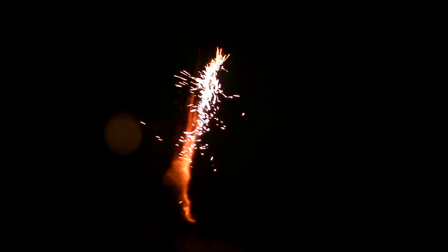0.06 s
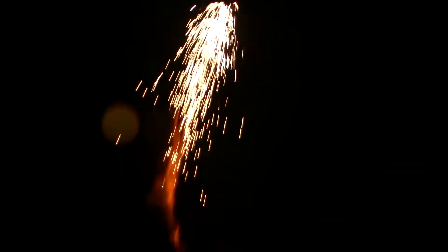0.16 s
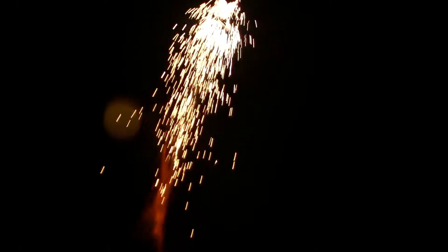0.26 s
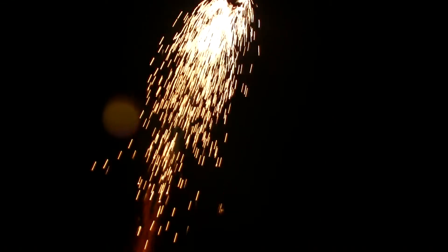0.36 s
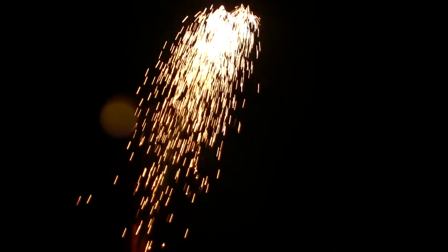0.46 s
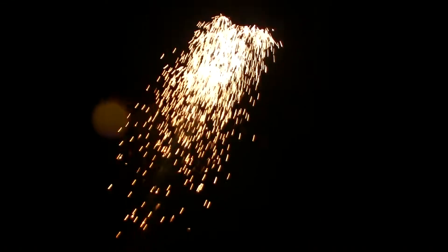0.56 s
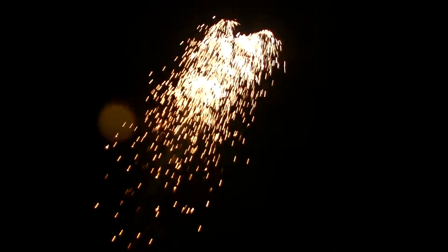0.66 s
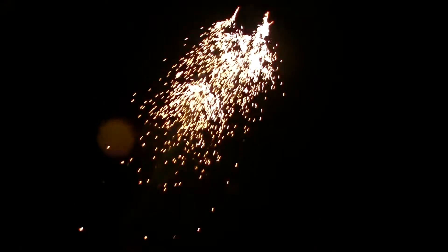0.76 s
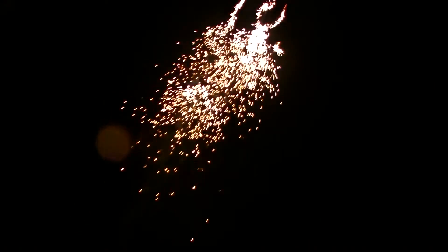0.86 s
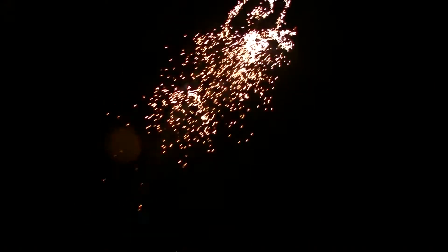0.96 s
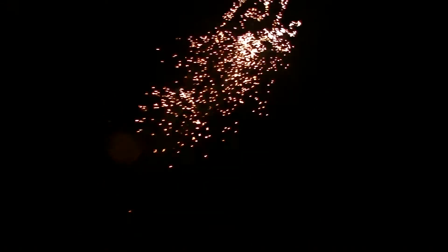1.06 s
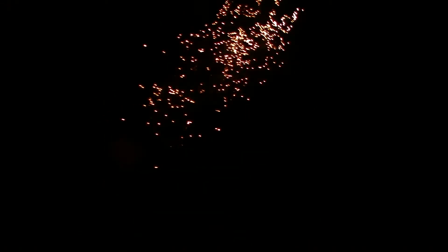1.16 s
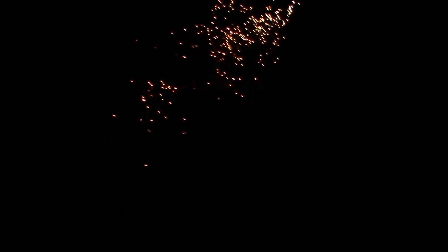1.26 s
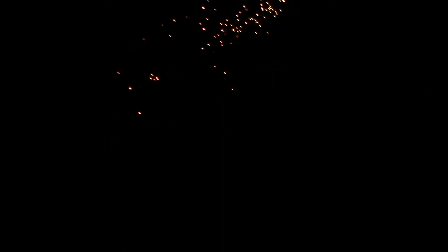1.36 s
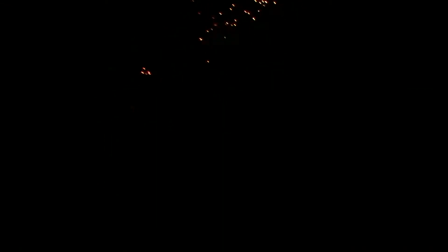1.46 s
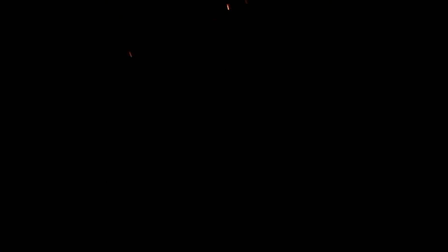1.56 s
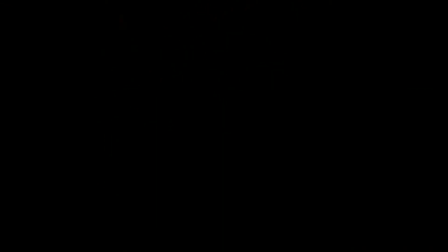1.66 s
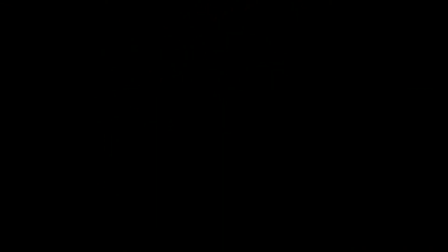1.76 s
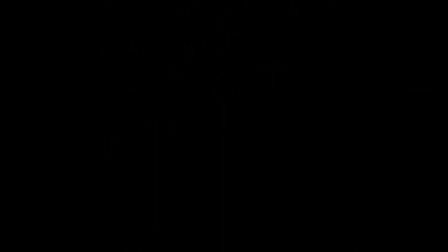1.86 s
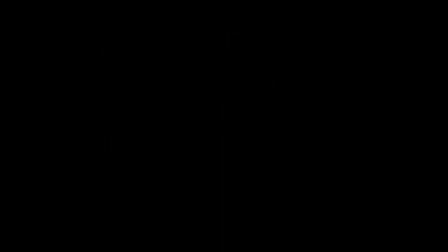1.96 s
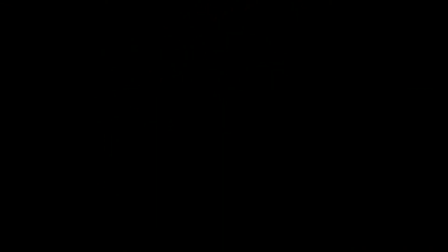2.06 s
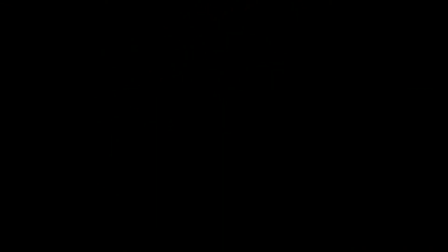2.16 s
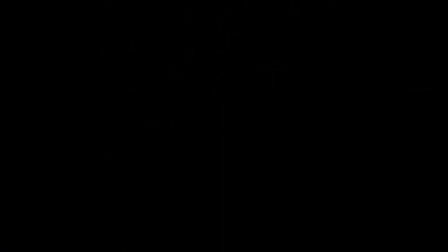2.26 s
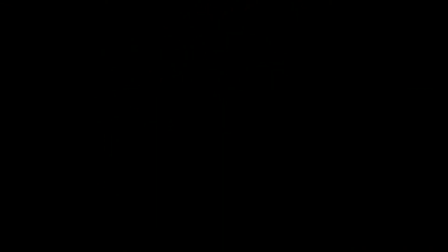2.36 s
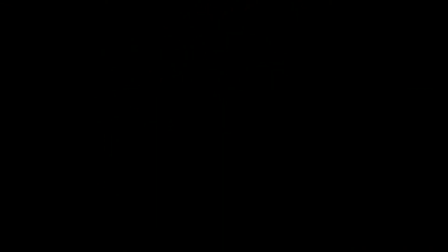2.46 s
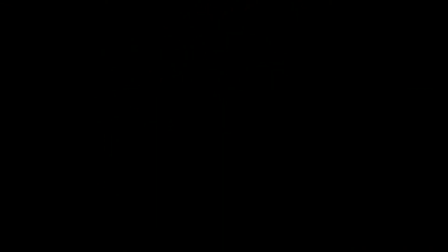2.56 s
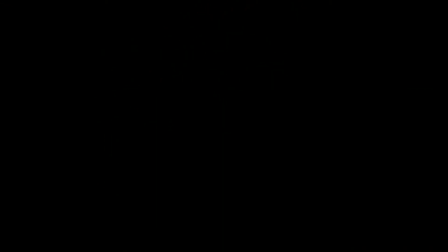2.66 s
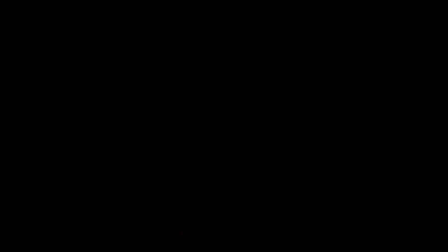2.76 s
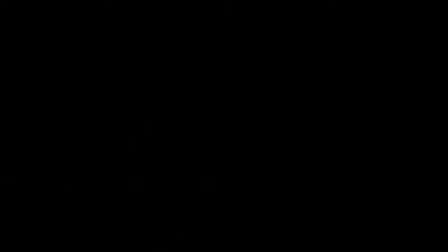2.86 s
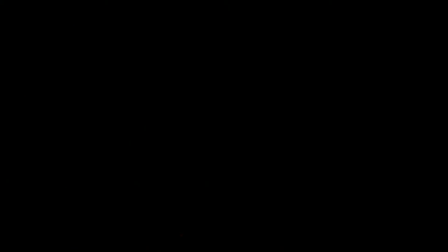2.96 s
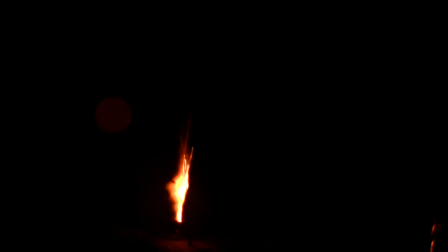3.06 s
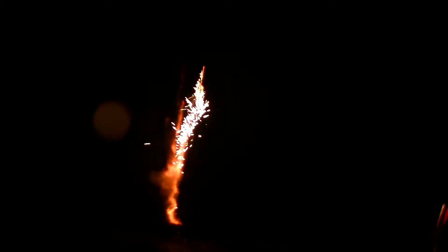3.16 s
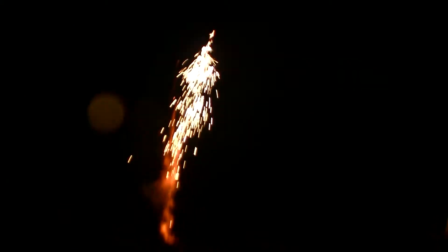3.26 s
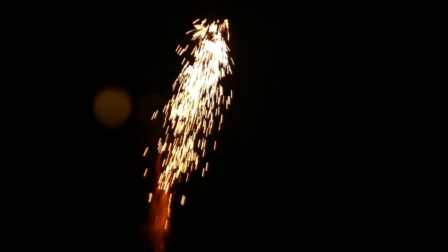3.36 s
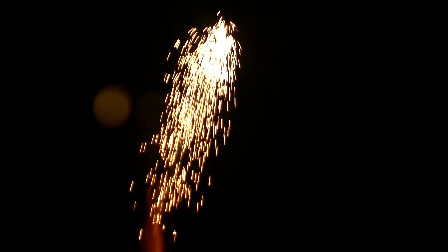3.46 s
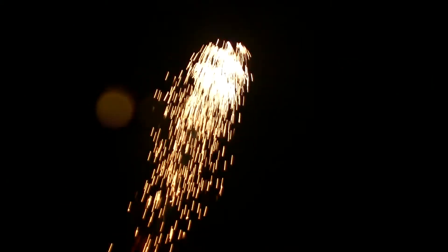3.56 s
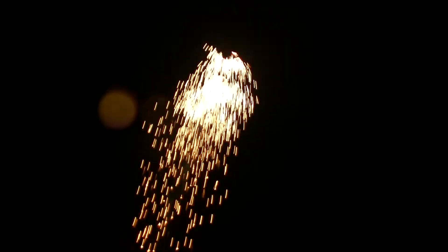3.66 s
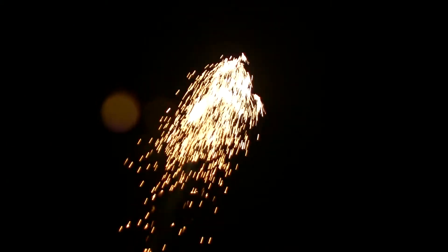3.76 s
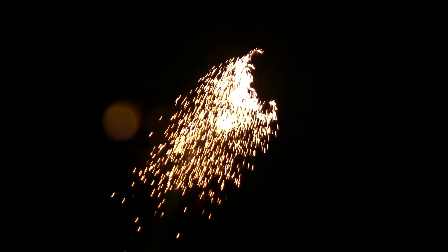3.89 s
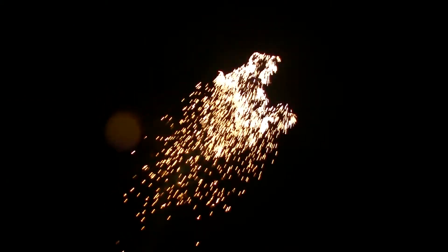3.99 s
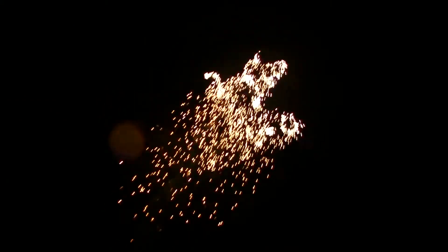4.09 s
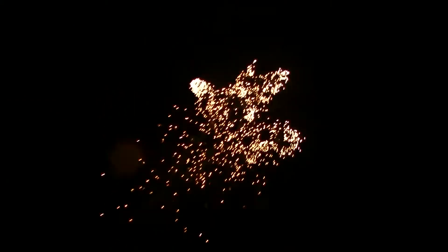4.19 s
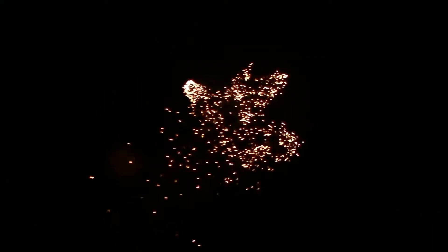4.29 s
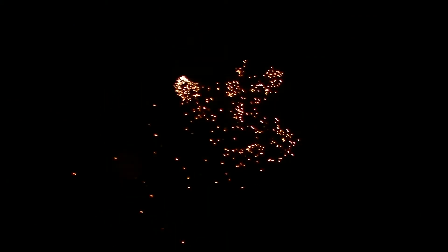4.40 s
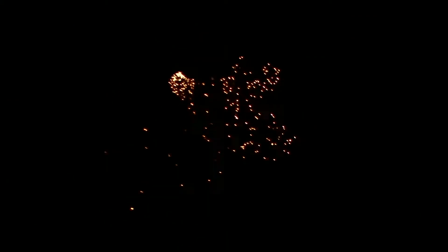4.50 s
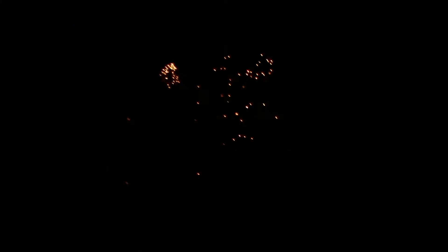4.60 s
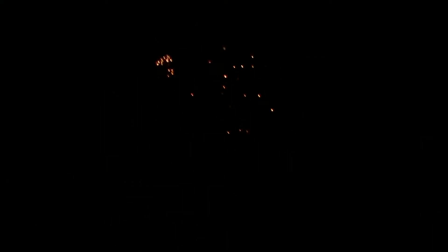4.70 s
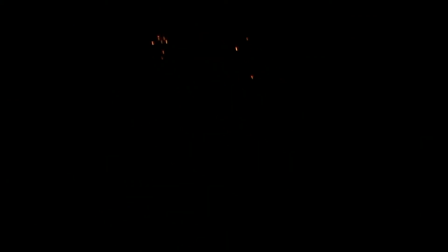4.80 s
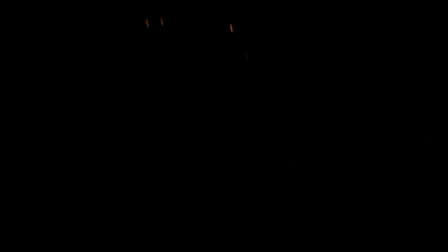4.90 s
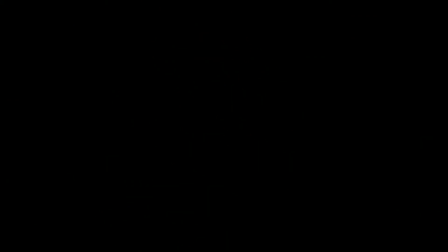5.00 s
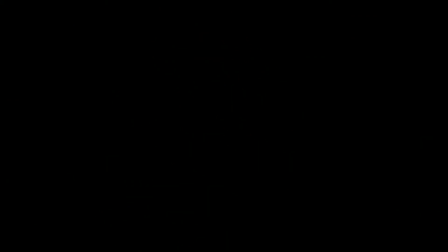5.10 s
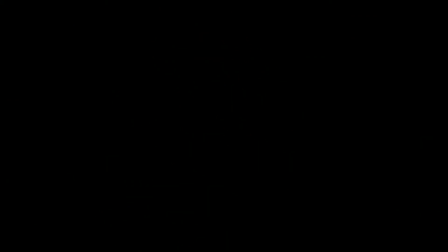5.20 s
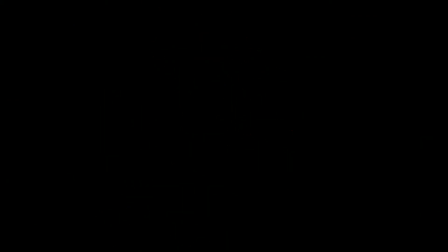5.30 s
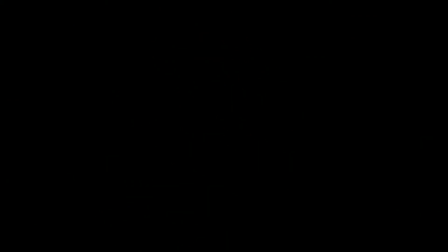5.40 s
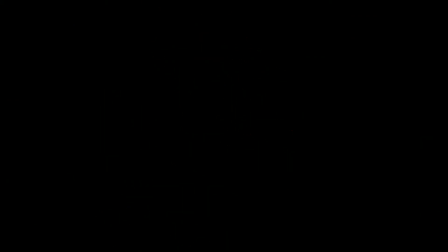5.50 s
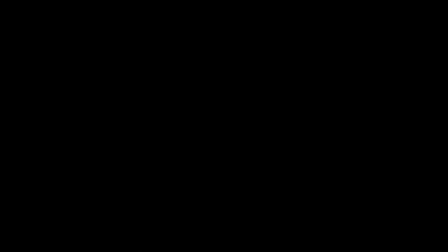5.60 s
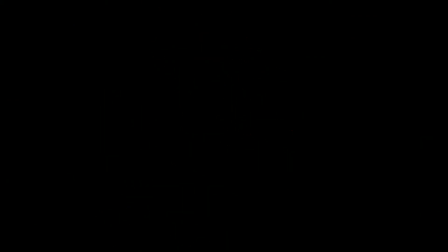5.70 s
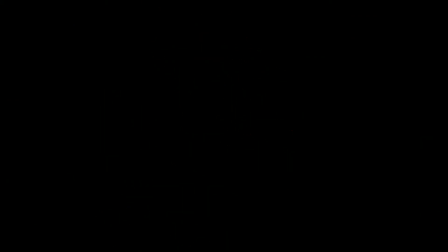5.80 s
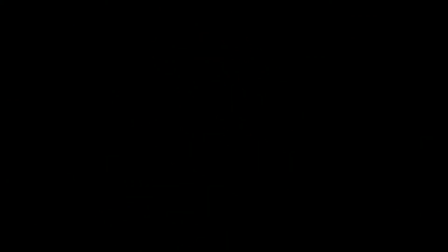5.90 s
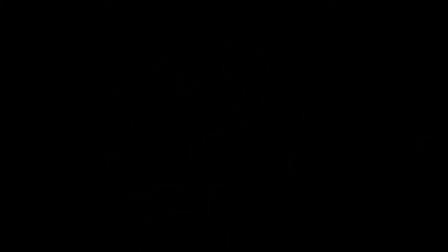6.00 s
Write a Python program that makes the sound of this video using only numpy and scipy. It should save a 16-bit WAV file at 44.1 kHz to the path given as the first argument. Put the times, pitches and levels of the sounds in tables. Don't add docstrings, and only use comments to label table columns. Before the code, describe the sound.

The sound opens mid-launch with a loud, gritty roar of burning gas and bright, crackling fizz, close to a small camera microphone in an open night yard. A rough whistle rides in it, starting high and shrill and sliding down over the first second, flaring and fluttering as the pellets spin. Around 0.8 to 1.2 s the roar thins into a few clearer singing tones that sink, then bend upward and vanish. A soft echo lingers; from 1.4 to 2.9 s tiny embers snap while low wind buffets, faint hum and hiss slowly return. At 3.1 s a brief gas leak and a hard, sharp pop fire the second load. Its screech bursts out, falls again, roughens and weakens after 4 s, with buzzing, wavering tones rising away by 4.6 s. Echo decays, a few faint snaps tick until 5.1 s, then hiss and light wind remain to about 6 s.

```python
import sys
import numpy as np
from scipy import signal
from scipy.fft import rfft, irfft, next_fast_len
from scipy.io import wavfile

SR = 44100
rng = np.random.default_rng(int(sys.argv[2]) if len(sys.argv) > 2 else 0)


def generate_wav(sig):
    pcm = np.round(np.clip(np.atleast_2d(sig).T, -1, 1) * 32767).astype(np.int16)
    wavfile.write(sys.argv[1], SR, pcm)


def nominal_scale(level):
    x = np.asarray(level, float) / 20
    return 10 ** x


N = 266540
T = np.arange(N) / SR
LAUNCH_S = (-.03, 3.11)

# frequency in Hz, level in dB.
ROAR = [(40, -52), (120, -30), (220, -13), (660, -8), (2000, -7), (3500, -3), (5000, -7), (7000, -20),
        (15000, -50), (20000, -120)]
# frequency in Hz, level in dB.
FIZZ = [(300, -90), (1500, -30), (3500, -4), (6000, -3), (9000, -13), (12000, -21), (15500, -32),
        (20000, -120)]


def unit(x):
    return x / np.sqrt(np.mean(x ** 2) + 1e-20)


def curves(rows, t=T):
    s, *cols = np.transpose(rows)
    return [np.interp(t, s, c) for c in cols]


def gate(start, end, fade, t=T):
    return np.clip(np.minimum(t - start, end - t) / fade + 1, 0, 1)


def during(start, end):
    return slice(max(round(start * SR) - 900, 0), round(end * SR) + 900)


def since_launch():
    return T - np.where(T < LAUNCH_S[1], *LAUNCH_S)


def wobble(rate):
    knots = np.sqrt(3 / 2) * rng.standard_normal(N // 128)
    return np.interp(T * rate, np.arange(len(knots)), knots)


def low(x, hz):
    return signal.sosfilt(signal.butter(2, hz, fs=SR, output="sos"), x)


def colour(x, points):
    m = next_fast_len(N + 8192)
    f, db = np.transpose(points)
    bins_hz = np.fft.rfftfreq(m, 1 / SR)
    gain = nominal_scale(np.interp(np.log(bins_hz + 1), np.log(f), db))
    return unit(irfft(rfft(x, m) * gain, m)[:N])


def noise(points):
    return colour(rng.standard_normal(N), points)


def shocks(rate, spread_db, smooth):
    when, size, plain = rng.random(N), rng.standard_normal(N), rng.standard_normal(N)
    sizes = nominal_scale(spread_db * np.clip(size, -3, 2.2))
    jumps = (when < rate / SR) * sizes * np.sign(plain)
    return unit(jumps) + smooth * plain[::-1]


def resonate(x, hz, width_hz):
    turn = np.exp(2j * np.pi * np.cumsum(hz) / SR)
    hold = np.exp(-np.pi * width_hz / SR)
    ringing = signal.lfilter([1], [1, -hold], x / turn)
    return unit((ringing * turn).imag)


def spin(flares, length):
    beam = np.zeros(N)
    for s, db in flares:
        span = during(s, s + .15)
        u = np.clip((T[span] - s + .006) / (.25 * length), 0, 60)
        beam[span] += nominal_scale(db) * u * np.exp(1 - u)
    return beam


def night():
    # time in seconds, level in dB.
    gusts = [(1.22, -75), (1.274, -60), (1.676, -52), (1.762, -34), (1.936, -35), (2.08, -47), (2.1, -44),
             (2.186, -36), (2.306, -45), (2.5, -37), (2.722, -40), (2.812, -29), (2.95, -43), (3.08, -41),
             (4.6, -69), (5.634, -42), (5.654, -48), (6.04, -42)]
    # frequency in Hz, level in dB.
    buffet = [(20, -24), (40, -5), (100, 0), (200, -3), (400, -16), (900, -40), (3000, -120)]
    # frequency in Hz, level in dB.
    far_hum = [(30, -30), (150, -8), (400, 0), (900, -4), (1800, -8), (4000, -24), (6000, -45),
               (12000, -120)]
    # frequency in Hz, level in dB.
    far_walls = [(200, -50), (700, -26), (1150, -9), (1550, -13), (1950, -8), (2350, 0), (2850, -11),
                 (4000, -22), (6000, -45), (12000, -120)]
    # frequency in Hz, level in dB.
    mic_hiss = [(1500, -30), (3500, -3), (5000, 0), (10000, -4), (14800, -11), (16000, -16)]
    # frequency in Hz, level in dB.
    afterglow = [(300, -24), (600, -6), (1500, -5), (3000, 0), (4500, -2), (6400, -10), (9000, -22),
                 (14000, -38), (17000, -80)]
    # time in seconds, level in dB, seconds to fade by 60 dB.
    burn_out = [
        (1.3, -48, 2.2),
        (4.45, -49, 2.4),
    ]

    since = T - np.where(T < LAUNCH_S[1] + .06, 1.1, 4.4)

    def recovered(spread_s):
        return 1 / (1 + np.exp((.85 - since) / spread_s))

    wind_db = np.where(since < -.08, -55, curves(gusts)[0])
    wind = nominal_scale(wind_db) * unit(nominal_scale(3.5 * wobble(25)) * noise(buffet))
    hum_db = -61 + 14 * recovered(.3)
    hum = nominal_scale(hum_db + 3) * noise(far_hum)
    hiss_db = -75 + 21 * recovered(.2)
    hiss = nominal_scale(hiss_db + 1.2 * wobble(15)) * noise(mic_hiss)
    echo_db = -50 + 8 * np.exp(-np.abs(since) / .4)
    echo = nominal_scale(echo_db + 1.5 + 1.5 * wobble(25)) * noise(far_walls)
    glow = np.zeros(N)
    for s, db, t60 in burn_out:
        glow += nominal_scale(db - 60 * np.abs(T - s) / t60) * (T > s - .35)
    return wind + glow * noise(afterglow) + hum + echo + hiss


def sparks():
    # time in seconds, peak level in dB.
    embers = [(1.4057, -39), (1.4666, -40), (1.4885, -43), (1.5564, -43), (1.5663, -45), (1.6043, -42),
              (1.6492, -39), (1.701, -47), (1.718, -44), (1.7679, -41), (1.8532, -45), (2.0318, -42),
              (2.3116, -40), (2.358, -41), (2.7033, -38), (2.8774, -38), (4.7714, -51), (4.79, -46),
              (4.8349, -51), (4.8574, -49), (5.0094, -54), (5.1128, -45)]
    snaps = np.zeros(N)
    for s, db in embers:
        snaps[round(s * SR)] = nominal_scale(db + 2)
    snaps = np.convolve(snaps, [.3, .7, .2, -.6, -.6, -.1, .1], "same")
    dying = nominal_scale(-60) * gate(1.1, 1.45, .35) + nominal_scale(-84) * gate(4.55, 4.7, .4)
    return snaps + dying * colour(shocks(140, spread_db=4, smooth=.6), FIZZ)


def pop():
    # blast time in seconds, blast in dB, gas leak time in seconds, leak in dB.
    shot = (3.11, 3, 3.1045, -14)
    # pitch in Hz, level in dB, seconds to fade by 60 dB.
    launch_tube = [(94, -15, .09), (255, 1, .035), (425, -4, .03), (200, -6, .05), (1000, -10, .015)]
    blast_s, blast_db, leak_s, leak_db = shot
    t = np.clip(T - blast_s, 0, None)
    blast = -1.6 * np.sin(np.pi * np.clip(t / .001, 0, 1))
    ring = np.zeros(N)
    for hz, level, t60 in launch_tube:
        ring += nominal_scale(level - 60 * t / t60) * np.sin(2 * np.pi * hz * np.clip(t - .001, 0, None))
    crack = nominal_scale(3 - 60 * t / .007) * (t > .0007) * low(rng.standard_normal(N), 10500)

    since = T - leak_s
    dying = nominal_scale(leak_db - 60 * np.clip(since - .012, 0, None) / .055) * np.clip(since / .002, 0, 1)
    seeping = nominal_scale(leak_db - 18 + 1000 * np.clip(since, -1, 0)) * (since <= 0)
    leak = (dying + seeping) * noise(ROAR[2:])
    return nominal_scale(blast_db) * (blast + .6 * ring + crack) + leak


def ignition():
    # start in seconds, end in seconds, first pitch in Hz, last pitch in Hz, level in dB.
    whistles = [(.02, .095, 3800, 3300, -18), (3.146, 3.195, 4000, 3650, -17),
                (3.22, 3.33, 3450, 3250, -16), (.66, .78, 2330, 2250, -21), (.45, .53, 2750, 2720, -20),
                (.84, .94, 2300, 2280, -23), (3.8, 3.9, 2200, 1980, -22), (3.9, 3.99, 2250, 2280, -21)]
    out = np.zeros(N)
    for start, end, hz, end_hz, db in whistles:
        span = during(start, end)
        pitch = np.interp(T[span], [start, end], [hz, end_hz]) * (1 + .025 * wobble(150)[span])
        swell = nominal_scale(db + 1.8 * wobble(110)[span]) * gate(start + .015, end, .015, T[span])
        out[span] += swell * np.sin(2 * np.pi * np.cumsum(pitch) / SR)
    return out


def song(rows, beam, rough, share, octave_db, start, end, uneven_db):
    first, last = rows[0][0], rows[-1][0]
    span = during(first, last)
    t = T[span]
    hz, db = curves(rows, t)
    beam = share * beam[span]
    loose = rough * np.interp(t, [first, last], [1.7, .3])
    phase = 2 * np.pi * np.cumsum(hz * (1 + .014 * loose * wobble(200)[span])) / SR
    tone = nominal_scale(db + 2.5 * loose * wobble(90)[span]) * np.sin(phase)

    over_db = db + octave_db - 42 * np.log2(hz / hz.min())
    octave = (nominal_scale(over_db - 4 + 4.5 * wobble(50)[span]) + 2.5 * beam) * np.sin(2 * phase)
    over = np.zeros(len(t))
    for k, fall_db in enumerate((2, -4, -12), start=3):
        over += beam * nominal_scale(fall_db + 4 * wobble(40)[span]) * np.sin(k * phase)

    half_db = db + uneven_db - 22 * (1 - gate(start, end, .05, t))
    facing = .2 + np.clip(beam / nominal_scale(half_db - 9), 0, 1.2)
    odd = np.zeros(len(t))
    for k, fall_db in enumerate((1, -7, -22, -30, -38), start=1):
        odd += nominal_scale(fall_db) * np.sin((k + .5) * phase)
    half = nominal_scale(half_db) * (np.sin(phase / 2) + facing * odd)

    out = np.zeros(N)
    out[span] = np.sqrt(2) * gate(first, last, .012, t) * (tone + octave + over + half)
    return out


def singing():
    # time in seconds, pitch in Hz, tone level in dB.
    songs = [
        [(.8, 2370, -22), (.855, 2090, -19), (.9, 1960, -22), (.95, 1970, -23), (.99, 2150, -24),
         (1.02, 2220, -17), (1.055, 2220, -18), (1.105, 2375, -22), (1.19, 2755, -38)],
        [(.94, 2300, -24), (.97, 2250, -17), (1.0, 2400, -24), (1.07, 2480, -23), (1.135, 2750, -36)],
        [(3.98, 2148, -26), (4.012, 2080, -20), (4.054, 2000, -23), (4.09, 2130, -20), (4.266, 2200, -24),
         (4.298, 2500, -29), (4.345, 2760, -38)],
        [(4.2, 2120, -18), (4.24, 2000, -26), (4.306, 1921, -31), (4.38, 1964, -30), (4.526, 2364, -33),
         (4.57, 2680, -44)],
    ]
    # roughness, share of the beam, octave level in dB, start and end in seconds
    # of the alternating shocks, half pitch in dB against the tone.
    singers = [
        (.8, 1, -16, 1.0, 1.06, -13),
        (.8, .1, -24, .94, .95, -45),
        (1.6, .3, -11, 4.06, 4.25, -11),
        (.8, 1, -11, 4.29, 4.42, -7),
    ]
    # time in seconds, peak level in dB.
    sweeps = [(1.022, -38), (1.072, -33), (1.118, -42), (4.255, -38), (4.31, -43), (4.358, -36),
              (4.405, -43), (4.455, -41)]
    beam = nominal_scale(-12) * spin(sweeps, .034)
    return sum(song(rows, beam, *singer) for rows, singer in zip(songs, singers))


def burn():
    # time in seconds, tube pitch in Hz, burn strength in dB.
    flights = [
        [(0.0, 3540, -24), (0.052, 3450, -23), (0.09, 3420, -14), (0.162, 3090, -17), (0.262, 3050, -17),
         (0.65, 2530, -19.5), (0.878, 2130, -22), (0.975, 2240, -24), (1.05, 2240, -35)],
        [(3.16, 3630, -22), (3.174, 3630, -15), (3.204, 3480, -18), (3.286, 3290, -13), (3.41, 2990, -19),
         (3.876, 2420, -18), (4.09, 2100, -23), (4.26, 2190, -25), (4.33, 2240, -36)],
    ]
    # time in seconds, peak level in dB.
    nozzle_flares = [(0.0114, -11), (0.0348, -8), (0.0654, -10), (0.0887, -6), (0.1825, -7), (0.4638, -11),
                     (0.5516, -11), (0.632, -12), (0.6674, -13), (0.7724, -12), (0.8145, -13),
                     (0.8684, -14), (0.9254, -14), (0.9674, -14), (1.0234, -20), (3.1737, -4), (3.2494, -9),
                     (3.3034, -7), (3.3484, -9), (3.4054, -9), (3.5334, -11), (3.6084, -11), (3.6794, -10),
                     (3.7754, -11), (3.8676, -7), (3.9484, -14), (4.0104, -14), (4.0974, -18),
                     (4.1584, -17), (4.2094, -20)]
    # frequency in Hz, level in dB.
    nozzle_mouth = [(100, -60), (600, -24), (1800, 0), (5000, 0), (12000, -20)]

    hz, ring_db = curves(flights[0] + flights[1])
    age = since_launch()
    alight = sum(gate(rows[0][0] + .01, rows[-1][0], .02) for rows in flights)
    roar_db = ring_db - 7 - 12 * np.exp(-age / .2) - 4.5 * age ** 4
    fizz_db = ring_db - 10.5 - 1.5 * age
    facing = .82 + np.clip(spin(nozzle_flares, .035) / nominal_scale(fizz_db + 25), 0, .8)

    crack = shocks(2100, spread_db=3.6, smooth=.45)
    roar = nominal_scale(roar_db + 10 + 1.2 * wobble(40)) * facing ** .5 * colour(crack, ROAR)
    fizzing = .6 * shocks(1500, spread_db=5, smooth=.4) + crack
    fizz = nominal_scale(fizz_db + 4.5 + 1.8 * wobble(45)) * facing * colour(fizzing, FIZZ)

    wide = resonate(crack, hz * (1.17 + .02 * wobble(12)), width_hz=1400)
    rattle = shocks(1800, spread_db=4, smooth=.5)
    narrow = np.zeros(N)
    for k in (.95, 1.02):
        strength = nominal_scale(3 * wobble(18) - 2.2)
        narrow += strength * resonate(rattle, hz * (k + .022 * wobble(14)), width_hz=150)
    ring_level = nominal_scale(ring_db - 4 + 7 * np.log2(3600 / hz) + 1.2 * wobble(30))
    ring = ring_level * facing ** .3 * colour(wide + nominal_scale(-.5) * narrow, nozzle_mouth)

    grouped = np.zeros(N)
    for k, share in ((.25, .35), (.5, .6), (1.5, 1.3), (2, 1.3)):
        grouped += share * resonate(crack, k * hz, width_hz=150 * (k + .5))
    grouped = signal.sosfilt(signal.butter(2, 420, "high", fs=SR, output="sos"), grouped)
    groups = nominal_scale(roar_db + 2.5) * np.clip((2500 - hz) / 350, 0, 1) * grouped
    return alight * (roar + fizz + ring + groups)


def flight(x):
    since = since_launch()
    far = np.clip(since / 1.15, 0, 1) ** 2
    x = x + .45 * far * (low(x, 7000) - x) - .6 * far * low(x, 260)
    lag_s = .0042 * (1 - np.exp(-since / .2))
    ground = np.interp(T - lag_s, T, low(x, 1800))
    return x + .7 * np.exp(-since / .4) * ground


def yard(x):
    t = T[:SR // 2]
    tail = low(rng.standard_normal(len(t)), 5000) * nominal_scale(-60 * t / .5) * (t > .03)
    return signal.fftconvolve(x, tail / np.linalg.norm(tail))[:N]


def scene():
    background = night() + sparks()
    shot = pop()
    roar = flight(burn())
    scattered = nominal_scale(-19) * yard(roar + .4 * shot)
    return (background + shot + scattered + ignition() + singing() + roar)[None]


def band_limit(x):
    return signal.sosfilt(signal.butter(12, 16130, fs=SR, output="sos"), x)


def record(dry):
    clipped = dry / (1 + np.abs(dry / 1.02) ** 6) ** (1 / 6)
    limited = signal.sosfiltfilt(signal.butter(12, 16000, fs=SR, output="sos"), clipped)
    return band_limit(np.clip(limited, -1, 1))


dry = scene()
out = record(dry)
generate_wav(out)
```